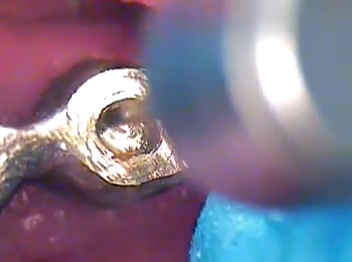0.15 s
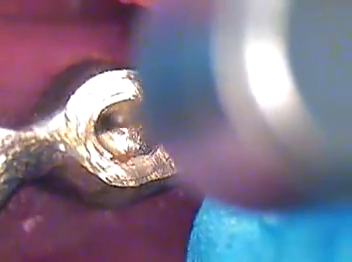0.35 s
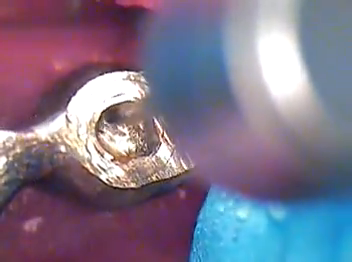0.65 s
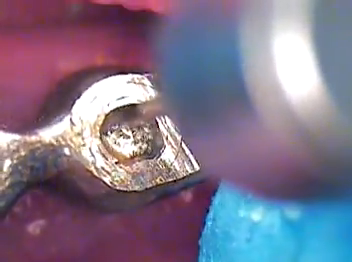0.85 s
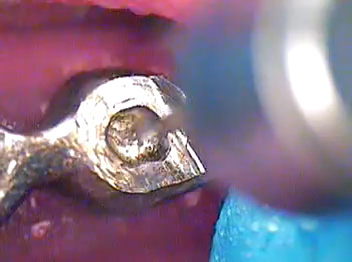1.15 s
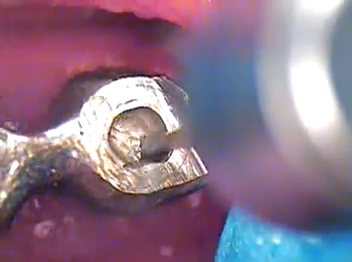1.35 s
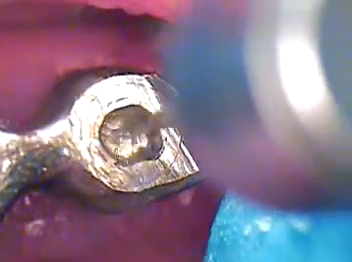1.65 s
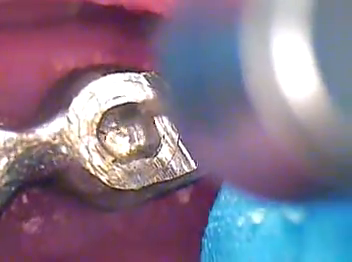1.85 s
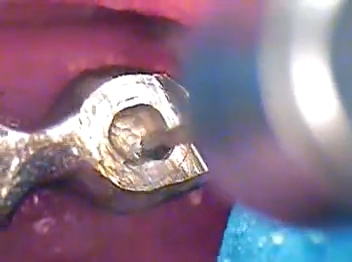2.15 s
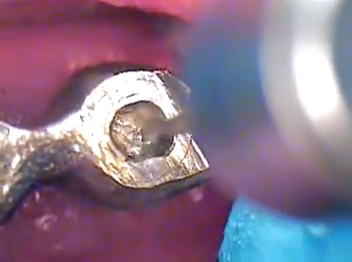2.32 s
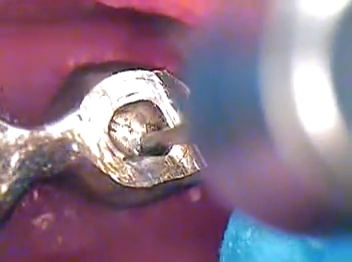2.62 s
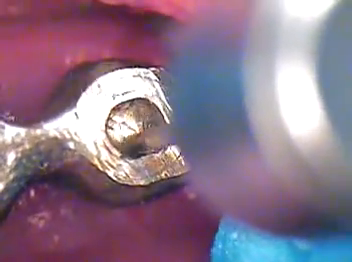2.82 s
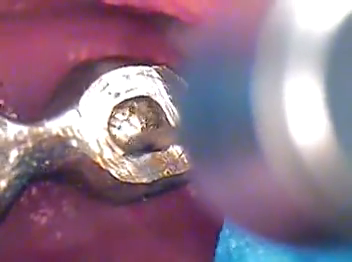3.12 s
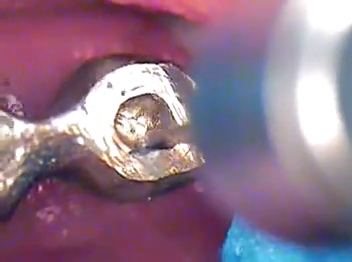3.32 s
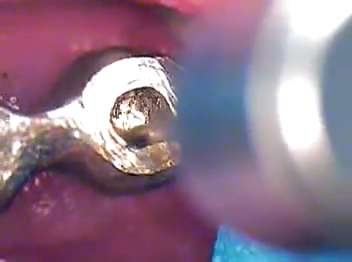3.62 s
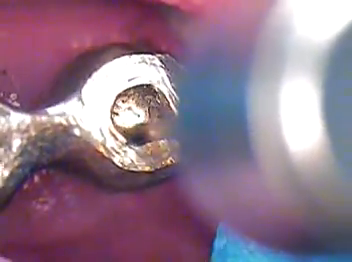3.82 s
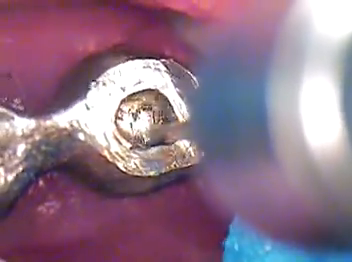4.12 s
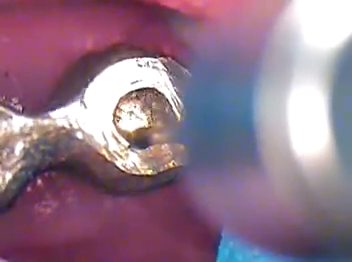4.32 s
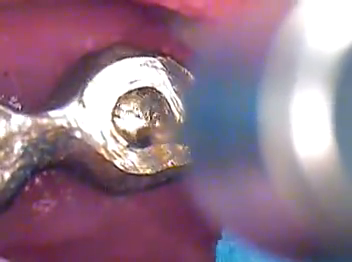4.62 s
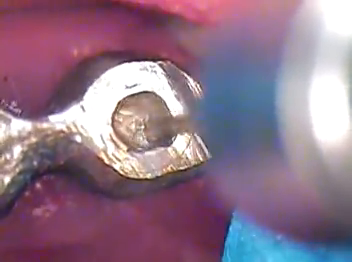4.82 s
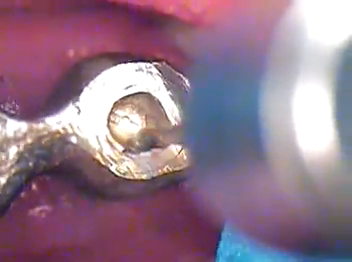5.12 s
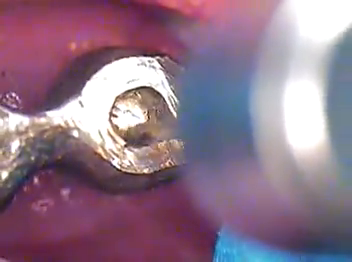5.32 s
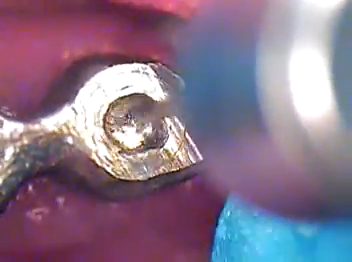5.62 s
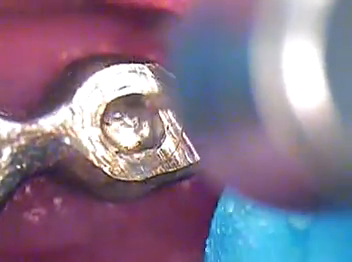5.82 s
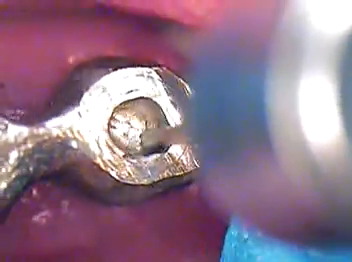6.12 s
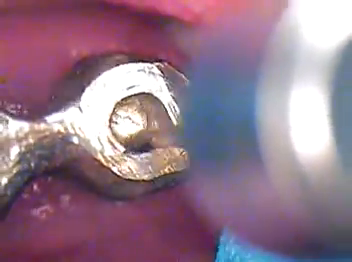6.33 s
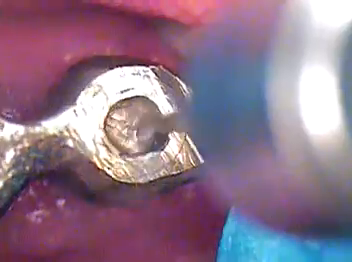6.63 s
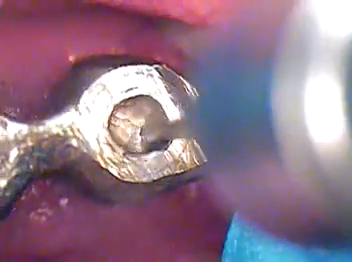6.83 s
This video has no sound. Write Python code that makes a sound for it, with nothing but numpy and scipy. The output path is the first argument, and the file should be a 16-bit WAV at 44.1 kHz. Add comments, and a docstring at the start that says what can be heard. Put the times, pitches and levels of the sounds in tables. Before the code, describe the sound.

A high-speed dental drill grinds a small metal part inside a mouth, close to the microphone in a small room. Its thin, high whine wavers over a bright, steady hiss of rushing air. Short squeals come as the tip catches the metal, more often after the first couple of seconds. Later the whine climbs in pitch and grows stronger, with a faint wet gurgle underneath.

```python
"""Dental turbine on metal

An air-turbine handpiece grinds a small metal part inside a mouth, close to a mono microphone.
The unbalanced rotor whines, sags under load and squeals where the bur catches. Cooling jet and exhaust
hiss through the resonances of head and mouth, over a low gurgle, soft knocks and a small room's rumble."""
import sys
import numpy as np
from scipy import signal
from scipy.fft import rfft, irfft
from scipy.io import wavfile

SR = 44100
rng = np.random.default_rng(int(sys.argv[2]) if len(sys.argv) > 2 else 0)


def unload_audio(sound):
    """Save the sound as a 16-bit wav file, at the path given as the first command line argument."""
    columns = np.transpose(np.atleast_2d(sound))
    # keep every value between -1 and 1, then stretch to whole-number steps
    steps = np.round(np.clip(columns, -1, 1) * 32767)
    wavfile.write(sys.argv[1], SR, steps.astype(np.int16))


N = 306936
TIME = np.arange(N) / SR
FREQS = np.maximum(np.arange(N // 2 + 1) * SR / N, 1)

# Rotor speed, lower under load: time_s, rotation_hz
ROTOR_SPEED = [(0.0, 4580), (0.63, 4248), (1.12, 4635), (1.86, 4463), (2.65, 4858), (3.03, 4639),
               (3.13, 4298), (3.27, 4358), (3.48, 4705), (3.9, 4236), (4.17, 4957), (4.29, 5116),
               (4.71, 4820), (4.88, 5323), (5.03, 5507), (5.21, 5583), (5.36, 5457), (5.58, 5452),
               (5.68, 5348), (5.84, 5345), (6.0, 5507), (6.24, 5511), (6.44, 5375), (6.58, 5406),
               (6.7, 5254), (6.96, 5384)]
# Shaft tone as the head passes it at each pitch: pitch_hz, level_db
WHINE_RESPONSE = [(4250, -52), (4650, -54.5), (4900, -51), (5100, -51.5), (5300, -45.5), (5550, -40.5)]
# The same for the tone at twice the shaft rate: pitch_hz, level_db
OCTAVE_RESPONSE = [(8500, -40.5), (8750, -42.5), (9150, -48), (9400, -45.5), (9800, -42.5), (10200, -43),
                   (10500, -58), (11100, -57)]
# Multiples of the ball cage rate and its sidebands: ratio_to_shaft, relative_level_db
BEARING_TONES = [(.8, -58), (1.2, -54), (1.4, -54), (1.8, -54)]
# Cooling jet, as the head moves over the tooth: time_s, relative_level_db
JET_LEVEL = [(0.0, -23.5), (0.29, -25), (1.08, -23.5), (1.51, -25.5), (1.84, -22.5), (2.29, -25.5),
             (2.34, -24.5), (3.2, -27.5), (3.39, -26.5), (3.74, -29), (4.03, -26.5), (4.52, -29),
             (4.98, -26), (5.39, -28.5), (5.72, -22.5), (5.93, -22.5), (6.14, -26.5), (6.43, -28.5),
             (6.82, -24.5), (6.96, -27)]
# Broad spectrum of rushing air: frequency_hz, relative_level_db
AIR_SPECTRUM = [(280.0, -31), (740.0, -28.0), (1220.0, -17.5), (1790.0, -21.1), (2220.0, -21),
                (2760.0, -20), (6250.0, -13), (6770.0, 1.5), (9840.0, 1), (10950.0, -10.5), (11620.0, 0.7),
                (13330.0, -1.5), (13560, -6), (14400, -12.5)]
# Resonances and notches of head, mouth and nearby surfaces: centre_hz, width_hz, lift_db
AIR_RESONANCES = [(1135, 160, 7), (1252, 84, 6.5), (1307, 38, 6.5), (1420.5, 31, 11.5), (1549, 34, 5.5),
                  (2087, 25, 8), (2414, 40, 8), (2717, 486, 10.5), (2919, 173, 10), (3090, 49, 9.5),
                  (3407, 380, 13), (3767, 66, 6), (3946, 140, 7), (4162, 54, 10.5), (4350, 320, 7.5),
                  (4600, 48, 8.5), (4635, 50, -3), (4893, 295, 10.5), (5770, 300, 7.5), (7250, 670, 3.5),
                  (7820, 55, 3), (8260, 210, -2.5), (8710, 610, 8), (9410, 250, 3.5)]
# Room rumble: frequency_hz, relative_level_db
RUMBLE_SPECTRUM = [(8, 5.5), (15, 3.5), (24, -19), (50, -11.5), (75, -23.5), (87, -21.5), (110, -35.5),
                   (200, -60)]
# Early reflections from nearby surfaces: delay_ms, gain_ratio
EARLY_REFLECTIONS = [(6.35, 0.088), (6.9, 0.033), (8.2, 0.031), (9.4, 0.037), (9.95, 0.069), (11.0, 0.069),
                     (12.5, 0.043), (17.2, 0.035)]
# Catches of the bur on the metal: start_s, length_s, whine_lift_db, octave_lift_db
BUR_CATCHES = [(.5, 0.2, 2, 9), (2.46, 0.15, 10, 0), (2.61, .09, 6, 7), (2.83, 0.21, -2, 4),
               (3.02, .08, 6, 7), (3.3, .23, 0, 6), (3.53, .11, 6, 11), (3.853, 0.3, 4, 8),
               (4.18, 0.2, 4, 6), (4.49, 0.23, 1.5, 8), (4.75, .13, 9, -5), (5.73, .11, -10, 8),
               (5.87, 0.39, 2, 0), (6.27, .2, -0.5, 12), (6.522, 0.089, 6.5, 3), (6.64, .14, 5.5, 8)]
# Small handling knocks: start_s, relative_level_db
HANDLING_KNOCKS = [(2.117, -69), (2.594, -69), (2.712, -65), (2.794, -73), (3.184, -72), (3.517, -67),
                   (3.609, -68), (3.716, -64), (4.032, -65), (4.213, -52.5), (4.338, -65), (4.594, -67),
                   (4.714, -69), (4.874, -71), (5.082, -69), (5.222, -66), (6.282, -63), (6.451, -65),
                   (6.599, -67), (6.754, -66)]
# Brief swells of the gurgle: peak_s, lift_db
GURGLE_SURGES = [(4.205, 8), (5.04, 4.5), (6.6, 2.5), (6.93, 6.5)]


def undb(db):
    """Amplitude grows tenfold for every 20 dB."""
    return 10 ** (np.asarray(db) / 20)


def lookup(table, at):
    """Linear interpolation in a two-column table."""
    return np.interp(at, *np.transpose(table))


def colour(spectrum):
    """Spectral gain, interpolated in decibels over log frequency."""
    hz, db = np.transpose(spectrum)
    return undb(np.interp(np.log(FREQS), np.log(hz), db))


def above(hz, order):
    """Butterworth high-pass magnitude."""
    return 1 / np.sqrt(1 + (hz / FREQS) ** (2 * order))


def below(hz, order):
    """Butterworth low-pass magnitude."""
    return 1 / np.sqrt(1 + (FREQS / hz) ** (2 * order))


def noise(gain):
    """Filtered white noise takes the filter's spectrum; its rms is set to 1."""
    x = irfft(rfft(rng.standard_normal(N)) * gain, N)
    return x / x.std()


def wander(rate_hz):
    """Low-passed noise gives a smooth random fluctuation of rms 1."""
    return noise(below(rate_hz, order=2))


def turbine():
    """Rotating unbalance radiates at the shaft rate; octave and bearing tones are phase-locked to it."""
    shaft_hz = lookup(ROTOR_SPEED, TIME) * (1 + .0006 * wander(14) + .0007 * wander(70))
    angle = 2 * np.pi * np.cumsum(shaft_hz) / SR
    whine_lift_db, octave_lift_db = squeal_lifts()
    duck_db = .41 * jet_swell_db()  # the whine weakens as the jet swells
    whine_db = lookup(WHINE_RESPONSE, shaft_hz) + whine_lift_db - duck_db
    octave_db = lookup(OCTAVE_RESPONSE, 2 * shaft_hz) + octave_lift_db
    # The bur chatters on the metal, so every tone flutters.
    whine = undb(whine_db + 2 * wander(12)) * np.sin(angle)
    octave = undb(octave_db + 2.4 * wander(26)) * np.sin(2 * angle)
    bearing = sum(undb(db + 2.6 * wander(3.6)) * np.sin(ratio * angle) for ratio, db in BEARING_TONES)
    tones = np.sqrt(2) * (whine + octave + undb(-2) * bearing)
    return reverberate(tones, t60_s=.2, level_db=-19)


def air_path():
    """Resonances of the head and mouth filter the broad spectrum of rushing air."""
    lift_db = sum(db / (1 + (2 * (FREQS - hz) / width) ** 2) for hz, width, db in AIR_RESONANCES)
    return colour(AIR_SPECTRUM) * undb(lift_db) * above(266, order=8)


def jet_swell_db(usual_db=-26):
    """The jet's level departs from its usual value as its aim changes."""
    return lookup(JET_LEVEL, TIME) - usual_db


def cooling_jet(path):
    """A jet hisses on the metal and excites a cavity resonance, which swells faster than the hiss."""
    cavity_power = 1 / (1 + (2 * (FREQS - 8750) / 1100) ** 4)
    flutter_db = .38 * wander(23)
    swell_db = jet_swell_db()
    hiss_spectrum = path * above(6170, order=16) * np.sqrt(1 - .9 * cavity_power)
    hiss = noise(hiss_spectrum) * undb(-28 + .8 * swell_db)
    ring = noise(path * np.sqrt(cavity_power)) * undb(-31 + 1.58 * swell_db)
    return (hiss + ring) * undb(flutter_db)


def exhaust(path):
    """Spent air leaves the head as a lower band of flow noise that follows the jet only a little."""
    rush = noise(path * above(1665, order=8) * below(6324, order=16))
    return rush * undb(-36.5 + .23 * jet_swell_db() + .2 * wander(8.6))


def gurgle(path, swell_s=.032):
    """Air over the wet mouth excites its lowest resonances unevenly and now and then wells up."""
    swells_db = sum(db * np.exp(-((TIME - peak) / swell_s) ** 2) for peak, db in GURGLE_SURGES)
    rush = noise(path * below(1760, order=8))
    return rush * undb(-49 + swells_db + .76 * wander(12))


def room_rumble(mains_hz=60):
    """The room's noise floor is low-frequency noise plus a faint mains hum."""
    hum = undb(-73) * np.sin(2 * np.pi * mains_hz * TIME)
    rumble = undb(-54) * noise(colour(RUMBLE_SPECTRUM) * below(250, order=4))
    return rumble + hum


def reflect(direct):
    """Comb filtering: weak delayed copies interfere with the direct sound and ripple its spectrum."""
    comb = 1 + sum(gain * np.exp(-2j * np.pi * FREQS * ms / 1000) for ms, gain in EARLY_REFLECTIONS)
    return irfft(rfft(direct) * comb, N)


def reverberate(direct, t60_s, level_db, gap_s=.012):
    """Convolution with exponentially decaying noise adds a diffuse room tail."""
    response = rng.standard_normal(N) * undb(-60 * TIME / t60_s) * (TIME > gap_s)
    response /= np.linalg.norm(response)
    return direct + undb(level_db) * irfft(rfft(direct) * rfft(response), N)


def squeal_lifts(edge_s=.032):
    """Amplitude modulation: each catch of the bur shifts the decibel levels of whine and octave."""
    lifts_db = np.zeros((2, N))
    for start, length, whine_db, octave_db in BUR_CATCHES:
        inside_s = np.minimum(TIME - start, start + length - TIME)
        envelope = np.clip(.5 + inside_s / edge_s, 0, 1)
        lifts_db += np.outer([whine_db, octave_db], envelope)
    return lifts_db


def knocks(usual_hz=206, pitch_spread=.09, rise_cycles=.85):
    """Handling excites damped vibrations that swell and die within a few cycles."""
    out = np.zeros(N)
    for start, db in HANDLING_KNOCKS:
        pitch_hz = usual_hz * np.exp(pitch_spread * rng.standard_normal())
        cycles = pitch_hz * np.maximum(TIME - start, 0)
        age = cycles / rise_cycles
        envelope = age * np.exp(1 - age)
        out += undb(db + 1) * envelope * np.sin(2 * np.pi * cycles)
    return out


def scene():
    """The sources superpose at one microphone, the same on both channels."""
    path = air_path()
    direct = turbine() + cooling_jet(path) + exhaust(path) + gurgle(path) + knocks()
    mono = reflect(direct) + room_rumble()
    return np.array([mono, mono])


def record(dry):
    """An elliptic low-pass cuts the top treble steeply; a small constant offset is added."""
    cutoff_hz, offset = 14450, .0108
    low_pass = signal.ellip(10, .1, 80, cutoff_hz, fs=SR, output="sos")
    return signal.sosfilt(low_pass, dry) + offset


dry = scene()
out = record(dry)
unload_audio(out)
```